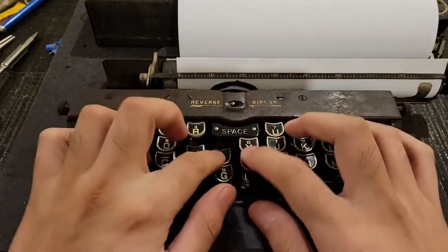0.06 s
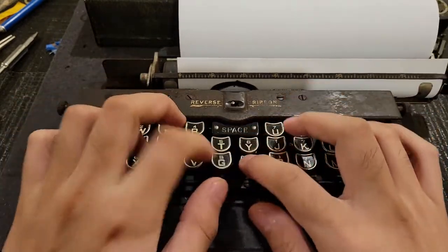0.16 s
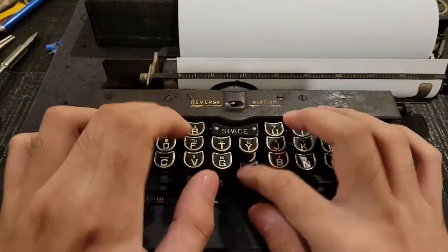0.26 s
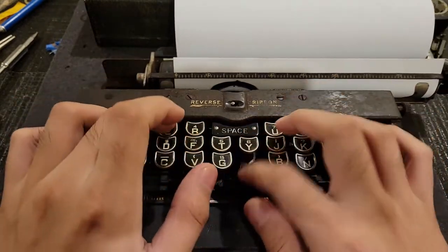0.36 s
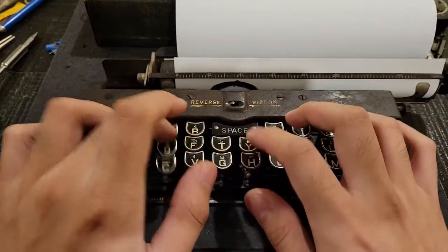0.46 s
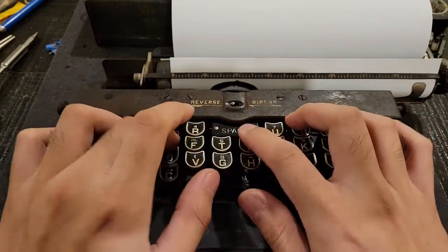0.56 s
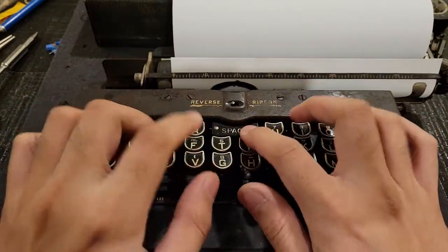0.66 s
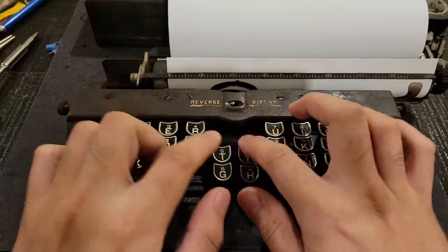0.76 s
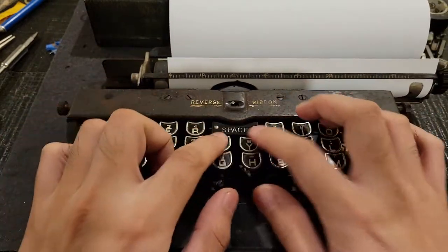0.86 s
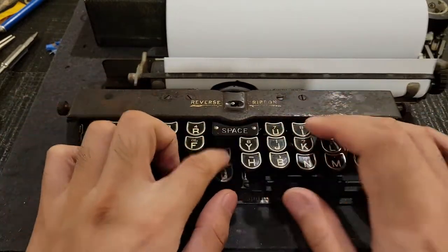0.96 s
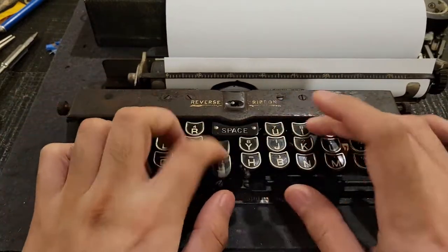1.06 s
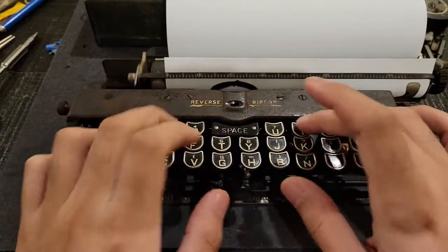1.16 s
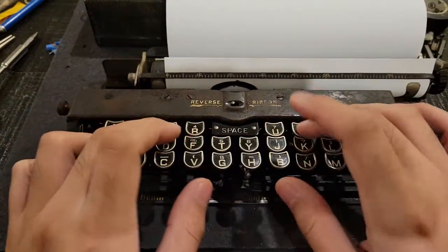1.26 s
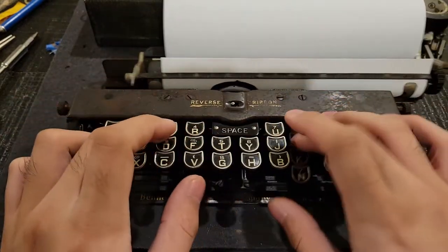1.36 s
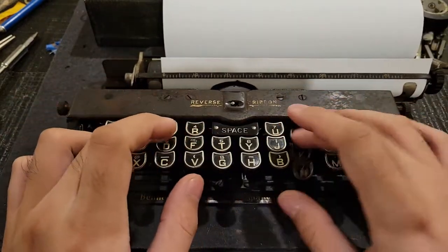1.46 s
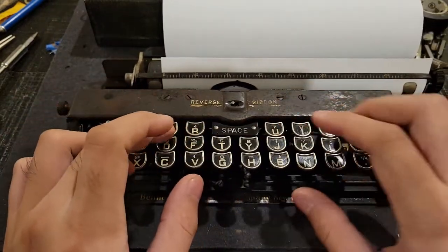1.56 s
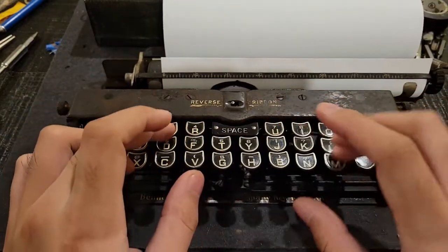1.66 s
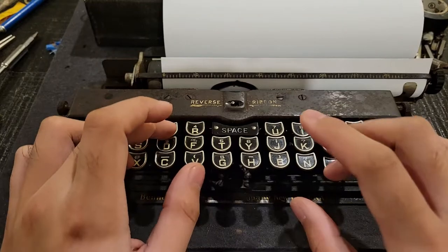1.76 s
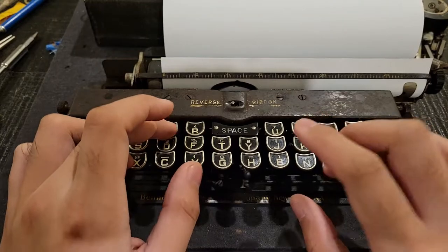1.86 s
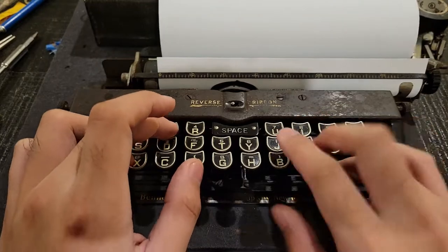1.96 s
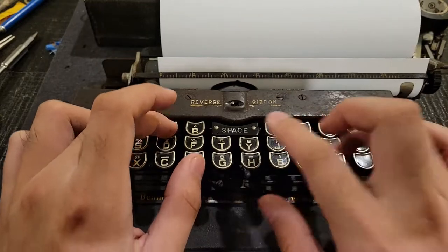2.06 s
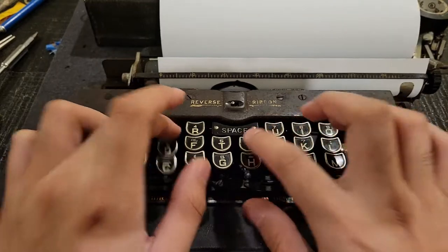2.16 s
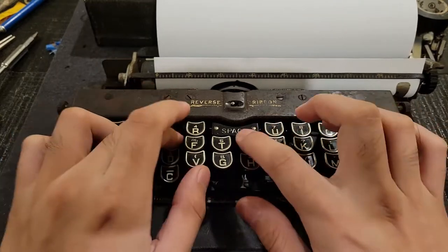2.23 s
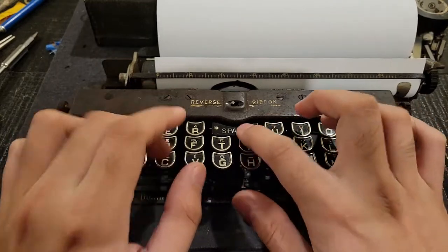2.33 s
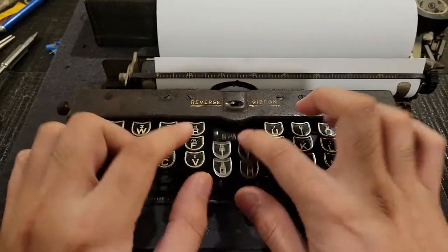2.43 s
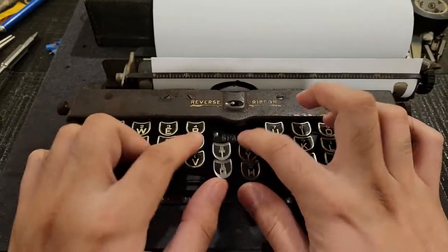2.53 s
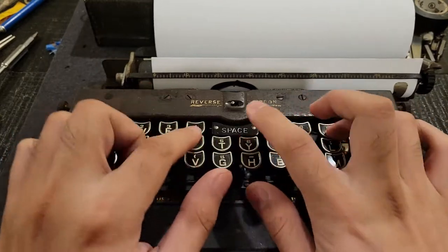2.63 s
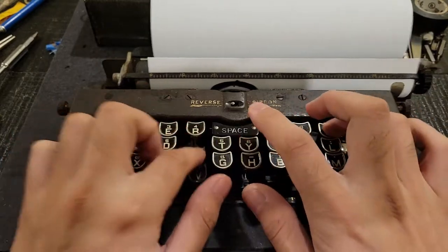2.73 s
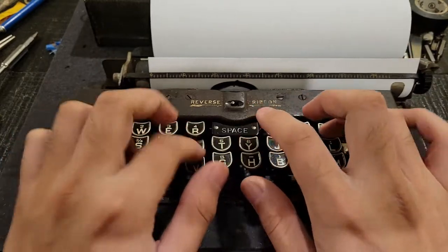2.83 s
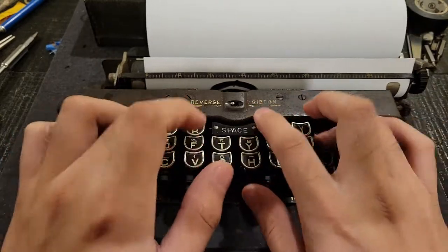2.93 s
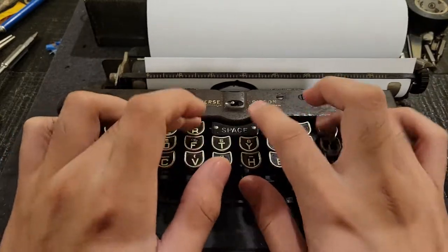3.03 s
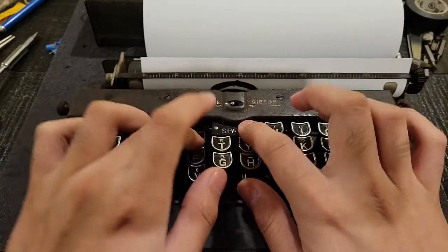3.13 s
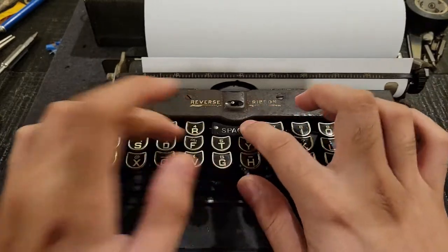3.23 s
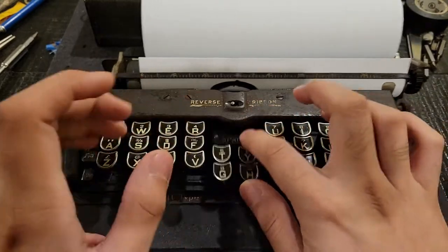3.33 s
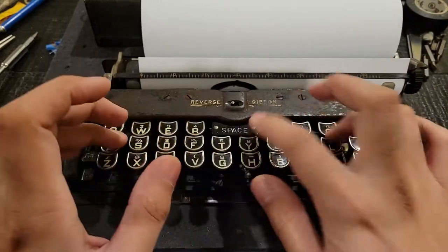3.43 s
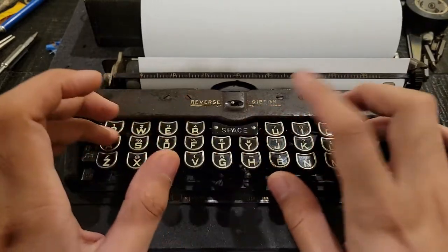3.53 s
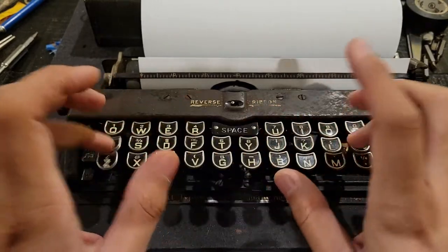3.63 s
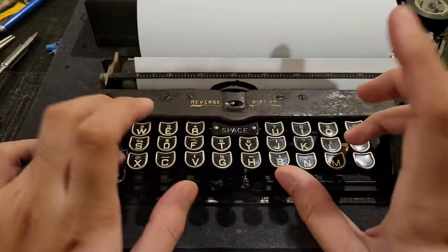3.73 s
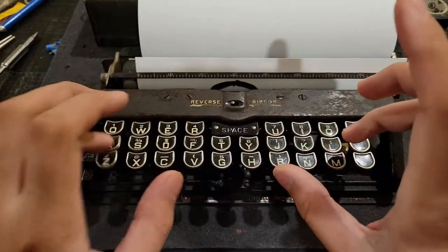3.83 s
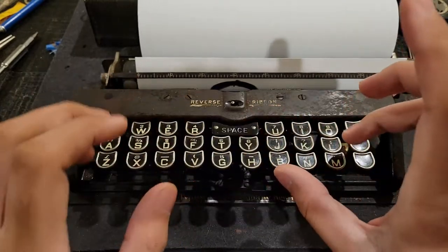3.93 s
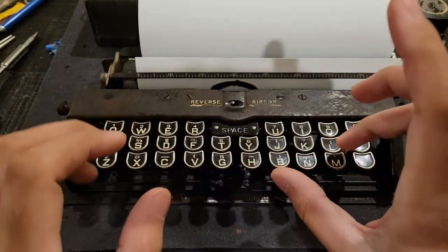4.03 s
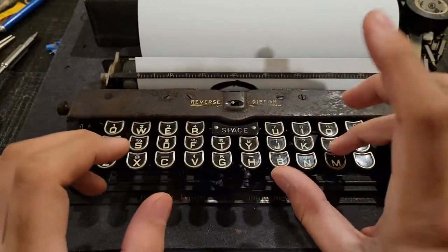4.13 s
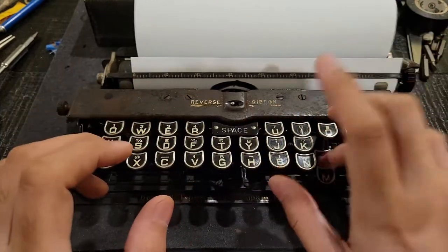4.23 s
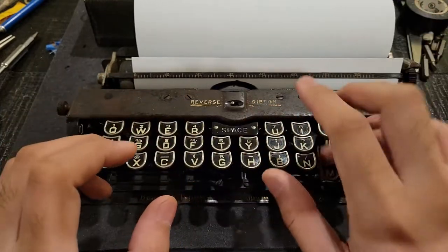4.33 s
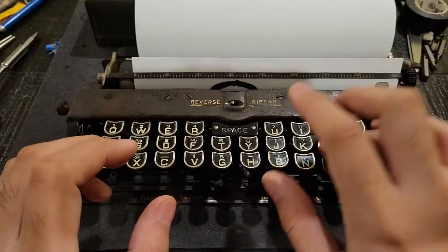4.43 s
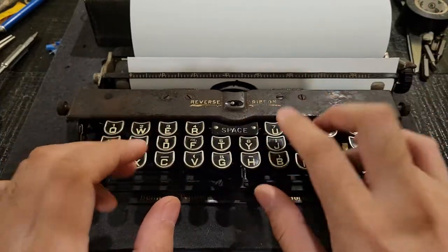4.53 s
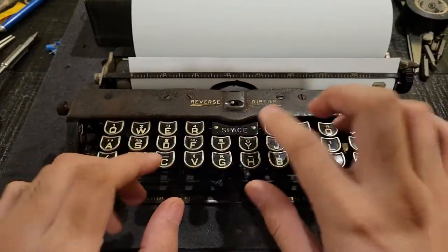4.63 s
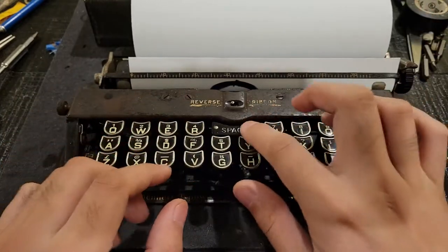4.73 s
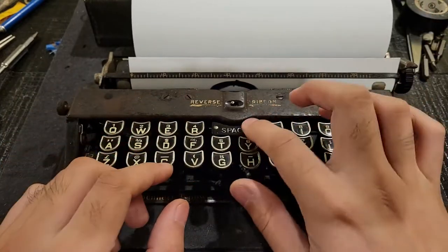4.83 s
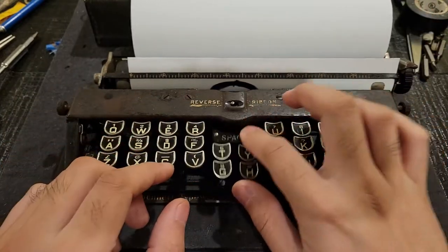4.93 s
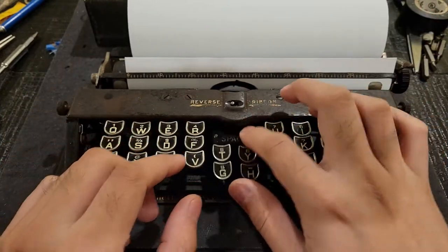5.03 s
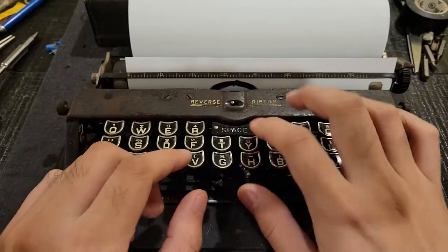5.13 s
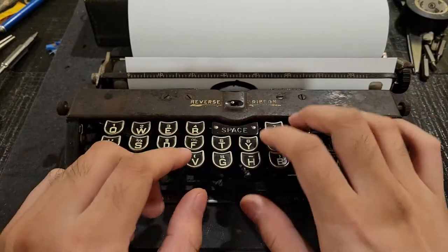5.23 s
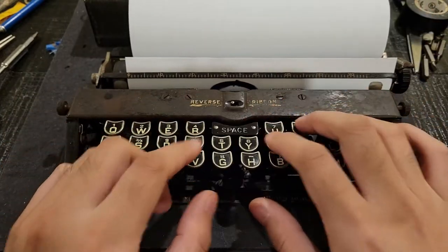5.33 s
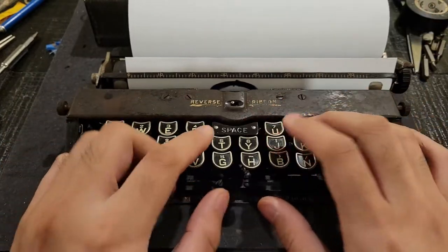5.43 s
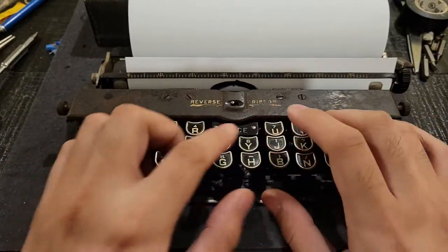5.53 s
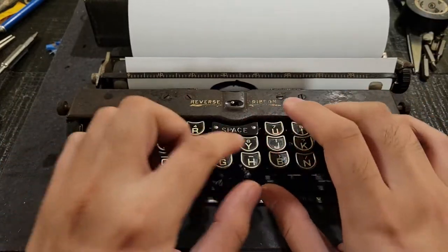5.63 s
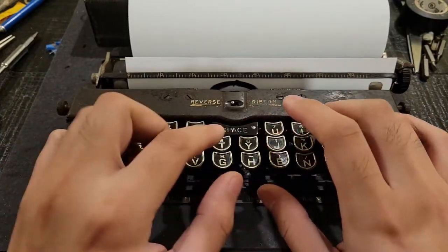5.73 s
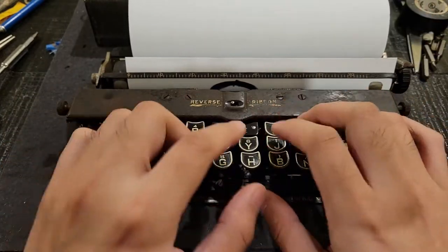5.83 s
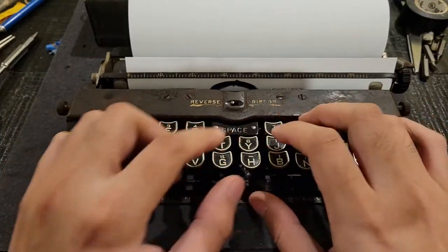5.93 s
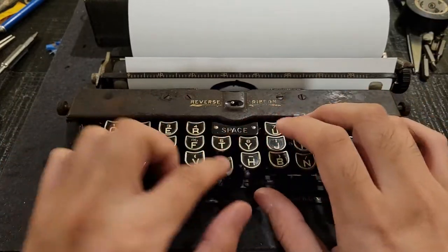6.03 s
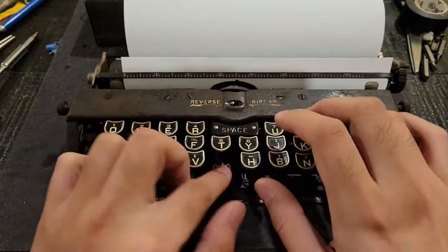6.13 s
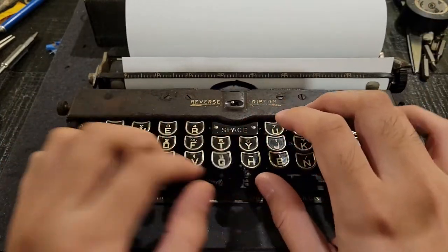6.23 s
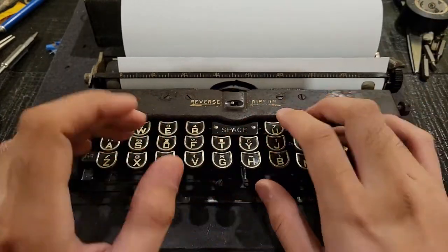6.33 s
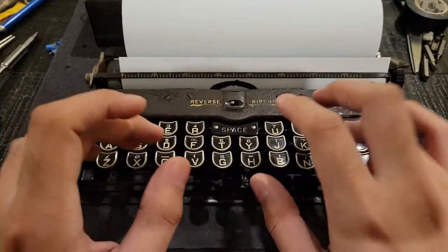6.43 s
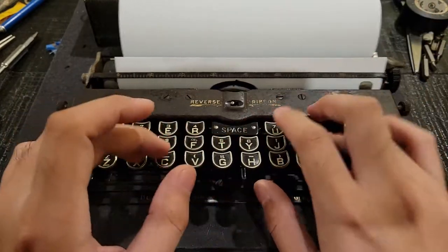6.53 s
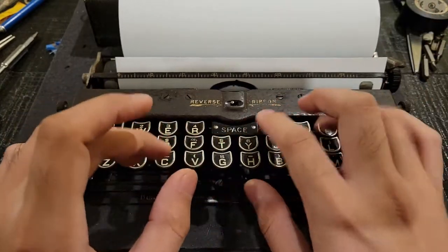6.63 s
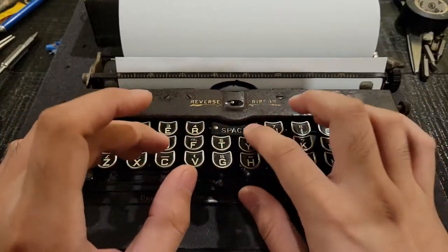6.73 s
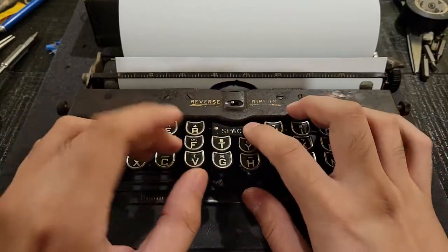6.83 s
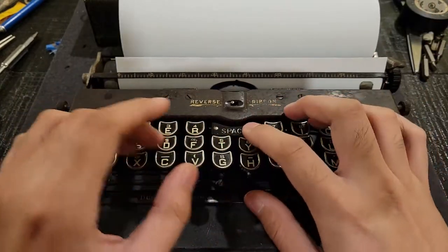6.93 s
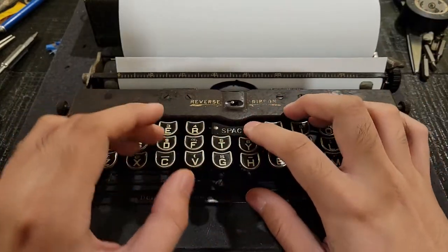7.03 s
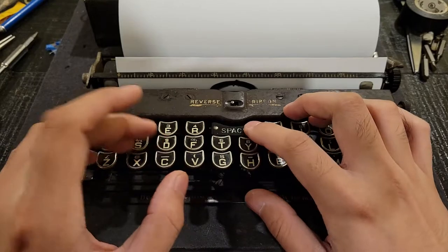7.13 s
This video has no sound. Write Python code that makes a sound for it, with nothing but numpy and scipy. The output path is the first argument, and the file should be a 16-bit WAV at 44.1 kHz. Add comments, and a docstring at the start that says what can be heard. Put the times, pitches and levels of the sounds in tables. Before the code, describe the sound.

Fast typing on an old steel typewriter: dense, sharp metallic clacks with loose-part rattle and soft desk thumps, short gaps, one longer pause, then typing again.

```python
"""Fast typing on a small steel typewriter on a desk, heard from just above the keys.
Every stroke is a run of knocks (key lever, type on the platen, escapement, return): a noise crack with the
chatter of loose parts, filtered by modes of steel levers, platen, case and base. The desk thumps, mostly
under bottoming keys: a soft noise push and a decaying sine. A return spring sings a thin sine now and then.
Random echoes of frame, desk and room follow the knocks, over quiet room noise with a wavering hum."""
import sys
import numpy as np
from scipy import signal
from scipy.fft import rfft, irfft
from scipy.io import wavfile
from scipy.ndimage import uniform_filter1d

SR = 44100
rng = np.random.default_rng(int(sys.argv[2]) if len(sys.argv) > 2 else 0)


def to_wav(s):
    """Save 16-bit WAV."""
    ch = np.atleast_2d(s).T  # columns
    pcm = np.round(np.clip(ch, -1, 1) * 32767)  # PCM
    wavfile.write(sys.argv[1], SR, pcm.astype(np.int16))


N = 317079

# low desk thumps, mostly keys bottoming out, one faint one from other handling;
# levels before fixed offsets: start_s, thump_db, top_ring_db (over thump)
DESK_THUMPS = [(0.1, -33, -6), (0.323, -32, -11.5), (0.551, -32.5, -3), (0.768, -30.5, 0.5),
               (1.01, -35.5, -2.5), (1.404, -35.5, -11), (1.529, -46, -23.5), (1.939, -35.5, -14.5),
               (2.237, -31.5, -1), (2.482, -29.5, -14.5), (2.758, -38.5, -10), (2.944, -32, -8),
               (3.128, -32.5, -3.5), (3.361, -30, -13), (3.713, -32.5, -3.5), (4.268, -32, -5),
               (4.505, -38.5, 4.5), (4.648, -43, -5), (4.974, -35, 3), (5.124, -51, -13),
               (6.094, -33.5, -3.5), (6.375, -33, -8.5), (6.579, -33.5, -0.5), (6.867, -40.5, -20)]


def gain_of(db):
    """Amplitude factor of a level in dB."""
    return 10 ** (np.asarray(db) / 20)


def evened(x):
    """Scales each row to rms 1."""
    return x / np.sqrt(np.mean(x ** 2, -1, keepdims=True) + 1e-30)


def read(points, hz):
    """Interpolates (Hz, value) points over log frequency."""
    f, value = np.transpose(points)
    return np.interp(np.log(hz + 1), np.log(f + 1), value)


def ringing(modes, hz, count, spread_db):
    """Summed mode responses; modes shift and wake unevenly, at random for each blow."""
    mode_hz, width_hz, mode_db = np.transpose(modes)
    loud, shift = rng.standard_normal((count, 2, len(mode_hz))).transpose(1, 0, 2)
    wake = gain_of(mode_db + spread_db * loud) * rng.choice([-1, 1], loud.shape)
    mode_hz = mode_hz * (1 + 0.018 * shift)
    response = 0
    for k in range(len(width_hz)):
        detune = (hz - mode_hz[:, k, None]) / width_hz[k]
        response = response + wake[:, k, None] / (1 + 2j * detune)
    return response


def to_ports(z, hz):
    """Two ports hear partly the same vibration, the nearer left one earlier and 1 dB louder."""
    # left-right likeness: frequency_hz, likeness
    likeness = [(40, 0.68), (500, 0.71), (1500, 0.75), (4000, 0.11)]
    lead_s = 0.11e-3
    same = np.clip(read(likeness, hz), 0, 1)
    mixed = same * z[0] + np.sqrt(1 - same ** 2) * z[1]
    right = mixed * np.exp(-2j * np.pi * hz * lead_s)
    return np.array([z[0] * gain_of(1.0), right])


def place(times_s, sounds):
    """Adds each two-channel sound at its time, which may lie just before the start."""
    size = sounds.shape[-1]
    out = np.zeros((2, N + 2 * size))
    for start_s, sound in zip(times_s, sounds.transpose(1, 0, 2)):
        out[:, size + round(start_s * SR):][:, :size] += sound
    return out[:, size:size + N]


def struck(push, response, db, window_ms):
    """Pushes through a response, set to db over their loudest window."""
    size = push.shape[-1]
    sound = irfft(to_ports(rfft(push) * response, np.fft.rfftfreq(size, 1 / SR)), size)
    window = max(round(window_ms * SR / 1000), 1)
    power = uniform_filter1d((sound ** 2).mean(0), window).max(-1)
    return sound * (gain_of(db) / np.sqrt(power))[:, None]


def base_ring(start_s, blow_db, case_db):
    """Base ring over each blow: follows the case, weaker; the knock at a thump can ring it harder."""
    under_case_db, thump_lag_s = -7.5, 0.006
    hard_ring_db, ring_per_thump_db, most_over_blow_db = -9.5, 0.58, -7
    base_db = blow_db + case_db + under_case_db
    for at_s, thump_db, _ in DESK_THUMPS:
        k = np.argmin(abs(start_s - at_s - thump_lag_s))
        hard_db = min(hard_ring_db + ring_per_thump_db * thump_db, blow_db[k] + most_over_blow_db)
        base_db[k] = max(base_db[k], hard_db)
    return base_db - blow_db


def contact_push(t, chatter_db, slide_end):
    """Noise force: a short crack; loose levers scrape up to it and chatter after it unevenly."""
    crack_t60_s, chatter_t60_s = 0.02, 0.1
    count, size = len(chatter_db), len(t)
    early, late = np.minimum(t, 0), np.maximum(t, 0)
    crack = np.exp(early / 0.0006) * gain_of(-60 * late / crack_t60_s)
    scrape = gain_of(-2.5) * np.exp(early / 0.0049)
    chatter = np.where(t < 0, scrape, 1) * gain_of(-60 * late / chatter_t60_s)
    wander = uniform_filter1d(rng.standard_normal((count, size)), size=16)
    uneven = gain_of(4.77 * evened(wander))
    rebounds = rng.random((count, size)) < 200.0 / SR  # about 200 per second
    uneven += gain_of(8.0) * signal.lfilter([1], [1, -0.97], rebounds)
    envelope = crack + gain_of(chatter_db)[:, None] * chatter * uneven
    envelope = envelope * (t < slide_end)
    return rng.standard_normal((count, 2, size)).transpose(1, 0, 2) * envelope


def knocks(size=4608):
    """Each contact excites the steel levers at once, and platen, case and base more slowly."""
    # contacts, levels before fixed offsets: start_s, blow_db, then over the blow:
    # platen_db, case_db, chatter_db (loose parts)
    contacts = [(0.0, -36, -12, -14.5, 24.5), (0.048, -23.5, -26, -20.5, -5.5),
                (.0636, -25, -10.5, -10.5, -4), (0.0771, -21.5, -7.5, -6.5, -5),
                (0.1016, -19.5, -18.5, -12, 16.5), (.154, -29, -10.5, -11.5, -1),
                (0.1849, -11, -22, -19, -8), (0.2446, -33.5, -19.5, -18.5, -8),
                (.2888, -33.5, -9, -7, -3.5), (0.3042, -14.5, -11, -14.5, -15),
                (.3298, -14.5, -26, -14.5, -18.5), (0.4143, -35, -8, -7.5, -4),
                (0.4446, -9, -21.5, -19.5, -15), (0.4578, -13.5, -18.5, -18.5, -19),
                (.4947, -20.5, -21, -17, -11), (.5085, -25.5, -12, -11.5, -14.5),
                (.532, -13, -14.5, -16.5, -7), (0.5575, -17, -18, -7.5, -17), (.612, -26.5, -10, -22.5, -2),
                (0.6355, -11.5, -16.5, -23.5, -20.5), (0.6637, -13.5, -17.5, -15, -15.5),
                (0.6888, -20, -17, -20, -16), (0.7367, -21, -20.5, -13, 2),
                (.752, -17.5, -12.5, -11.5, -12.5), (.779, -15.5, -13.5, -14.5, -15),
                (0.8703, -8, -18.5, -21, -21), (.9514, -37, -15, -10.5, -18), (0.9643, -20, -17, -13, -6),
                (.985, -27, -2, -5, -13.5), (1.012, -11, -19, -17, -20), (1.0859, -29, -14.5, -9, 4.5),
                (1.1128, -10.5, -16.5, -20, -12), (1.2416, -33, -25, -34.5, -26),
                (1.294, -49.5, -16.5, -14.5, -15.5), (1.325, -46, -28, -11, -20),
                (1.336, -32, -19, -24, -22), (1.35, -22.5, -13.5, -13.5, -14),
                (1.3717, -23.5, -6.5, -9, -0.5), (1.3984, -8, -16, -20, -14), (1.4909, -38.5, -8, -7, 3),
                (1.52, -17, -11, -14, -18), (1.549, -13.5, -14.5, -16.5, -6.5),
                (1.5811, -22.5, -16.5, -16.5, -12), (1.716, -42.5, -7, -9.5, -3.5),
                (1.728, -31.5, -15, -15, -28.5), (1.8949, -41, -1.5, -15.5, -8.5),
                (1.918, -21.5, -8.5, -8, -3.5), (1.9364, -18, -26, -9, -4.5),
                (1.9464, -15.5, -19.5, -12.5, -33.5), (2.0419, -33, -13, -7.5, -1.5),
                (2.0604, -19.5, -15, -14.5, -2.5), (2.117, -15, -11.5, -17, -6),
                (2.1571, -20.5, -11.5, -13.5, 1), (2.1945, -25.5, -11, -9.5, -5.5),
                (2.2232, -15, -16, -11.5, 0), (2.246, -19.5, -11, -12, -11.5),
                (2.2997, -26.5, -12, -14.5, -12), (2.3223, -12, -22.5, -19.5, -14.5),
                (2.356, -15.5, -13, -15.5, -11.5), (2.4556, -19.5, -23, -11, -13),
                (2.4695, -18, -6.5, -12.5, -7.5), (2.4949, -18, -20, -10.5, -9.5),
                (2.5879, -12.5, -22, -16.5, -16.5), (2.722, -30.5, -40, -14, -14.5),
                (2.7311, -21, -15, -8.5, -4), (2.752, -11.5, -20, -11, -1),
                (2.767, -8.5, -14.5, -18.5, -21), (2.8342, -28.5, -11, -15, 3.5),
                (2.8614, -11, -18.5, -23, -16.5), (2.8845, -17, -16, -11, -9.5),
                (2.9095, -17.5, -17, -12, -14), (2.9299, -20.5, -7, -7.5, -9),
                (2.941, -17.5, -14.5, -4.5, 1.5), (2.9523, -10, -18.5, -24.5, -11),
                (3.016, -35, -6.5, -8, 5), (3.044, -17.5, -12, -18, -15), (3.0749, -25, -14.5, -4.5, -10),
                (3.0905, -12, -16, -18, -13.5), (3.1195, -16.5, -14, -15.5, 6),
                (3.1391, -13.5, -14.5, -23, -11.5), (3.1555, -16.5, -11, -13.5, -9.5),
                (3.21, -29.5, -9.5, -14, -9.5), (3.234, -11, -19.5, -20.5, -15),
                (3.248, -14, -14.5, -14.5, -2.5), (3.3345, -20.5, -23.5, -13.5, -1),
                (3.3482, -18.5, -10.5, -9.5, -13.5), (3.3738, -19.5, -13.5, -8, -17),
                (3.3823, -20.5, -31, -16.5, -13), (3.425, -29.5, -19, -14.5, -1),
                (3.4425, -11, -21, -19, -25), (3.657, -21.5, -33.5, -39, -24),
                (3.664, -33, -8.5, -10.5, -3), (3.6991, -18, -9, -12.5, -6),
                (3.7145, -8.5, -18.5, -18.5, -10), (3.8074, -30.5, -13, -7, -3.5),
                (3.819, -14, -9, -25, -31.5), (3.8715, -13, -10, -17, -15.5), (3.9096, -20, -16.5, -16, -2),
                (4.2183, -23.5, -8.5, -18, -7), (4.2496, -20, -9, -11, 1), (4.262, -29, -17, 0.5, 18.5),
                (4.2718, -15.5, -17, -10, -10.5), (4.368, -23.5, -9, -14, -7), (4.4045, -45.5, 6, -3, -12),
                (4.424, -14, -13.5, -16, -13.5), (4.4576, -20, -8, -15, 5.5), (4.4804, -17, -11, -6.5, 24),
                (4.5028, -13, -18.5, -18, -15), (4.6151, -20.5, -10, -13, -4),
                (4.6523, -31.5, -17.5, 0.5, 5), (4.6659, -13.5, -12.5, -29, -10),
                (4.6989, -20, -18, -13, -9), (4.904, -50.5, -9.5, -7, -2.5),
                (4.9308, -24.5, -16.5, -9.5, -13), (4.9513, -23.5, -12.5, -4.5, -20.5),
                (4.9792, -19.5, -14.5, -5.5, -15), (5.0775, -39.5, -26, -4.5, -26),
                (5.1058, -26, -7, -9, 6.5), (5.1125, -10, -23.5, -17, -41.5),
                (5.2739, -39.5, -29, -25, -31), (5.288, -54.5, -17, -2, -14.5), (5.371, -67.5, -11, 4, 3),
                (5.466, -63, -22, -28, -23), (5.83, -78, -9, 3, 6), (6.0574, -23, -16, -9, -1),
                (6.0754, -15, -14.5, -15, -12.5), (6.1002, -8.5, -15, -17, -29),
                (6.189, -30.5, -11, -10.5, -14), (6.213, -35, -10, -10, -6),
                (6.2299, -18.5, -12, -17.5, -12.5), (6.2498, -24, -12, -8, -10),
                (6.3094, -36, -26, -17.5, -16), (6.3276, -22.5, -8.5, -14, -14.5),
                (6.3512, -21, -9, -8, -5), (6.3646, -18.5, -17, -8.5, 0), (6.378, -17.5, -12, -16, 7.5),
                (6.451, -15.5, -7, -15, -19.5), (6.475, -26.5, -7, -3, -6), (6.4928, -12, -12, -22, -11),
                (6.5302, -16, -18, -17.5, -6), (6.5434, -17.5, -10, -9, 21),
                (6.57, -12.5, -17.5, -13.5, -16), (6.6422, -36, -8, -9.5, -12),
                (6.6586, -18.5, -6.5, -10.5, -26), (6.6845, -24, -7, -7, -14.5),
                (6.7013, -8.5, -17, -19, -21), (6.7345, -19.5, -18, -21, -7.5), (6.863, -62, -3, 11, -1),
                (7.02, -74, -8, 2, 0)]
    # click spectrum: frequency_hz, level_db
    click = [(800, -36), (2500, 3.5), (5000, -1), (9000, -2), (11000, -6), (14000, -3)]
    # modes of levers, platen, case, base: frequency_hz, width_hz, level_db
    levers = [(2625, 190, 5), (4180, 150, 12), (5200, 540, 2), (6570, 370, 3), (7910, 210, 3),
              (13040, 530, 7.5), (15200, 600, -8.5)]
    platen = [(1475, 310, -0.5), (1800, 860, -9.5), (1980, 170, -3.5)]
    case = [(657, 36, -8.5), (771.6, 75, 0.5), (876, 88, -3.5), (1021.5, 180, -7.5)]
    base = [(373, 190, -5.5), (389.7, 80, 2.5), (465, 60, -2.5)]
    slide_s, neutral_ring_db = 0.02, -14.5
    bright_per_ring_db, bright_per_blow_db = -0.7, 0.0561

    start_s, blow_db, platen_db, case_db, chatter_db = np.transpose(contacts)
    count = len(start_s)
    # a glancing contact is bright and hardly moves platen and case; a heavy one is dull
    bright_db = bright_per_ring_db * ((platen_db + case_db) / 2 - neutral_ring_db)
    bright_db += bright_per_blow_db * (blow_db - blow_db.mean())  # harder is a little brighter
    base_db = base_ring(start_s, blow_db, case_db)

    t, hz = np.arange(size) / SR - slide_s, np.fft.rfftfreq(size, 1 / SR)
    push = contact_push(t, chatter_db, slide_end=t[-1] / 2)
    tilt = gain_of(bright_db[:, None] * np.tanh(2.2 * np.log((hz + 1) / 7000)) / 2)
    steel = gain_of(read(click, hz)) + 0.35 * ringing(levers, hz, count, spread_db=3.0)
    sound = struck(push, steel * tilt, blow_db + 1.0, window_ms=0.73)
    heavy = push * (1 - np.exp(-np.maximum(t, 0) / 0.0013))  # heavy parts take the blow slowly
    for modes, ring_db in (platen, platen_db), (case, case_db), (base, base_db):
        response = ringing(modes, hz, count, spread_db=2.5)
        sound += struck(heavy, response, blow_db + ring_db, window_ms=11.3)
    sound *= np.minimum((t[-1] - t) / slide_s, 1)  # end fade
    return place(start_s + 0.00045 - slide_s, sound)


def tail(x, decay, delay_ms):
    """Dense random echoes, each band dying at its own speed, partly different at each port."""
    noise = rng.standard_normal((2, SR * 3 // 4))
    hz, t, z = signal.stft(noise, SR, nperseg=256)
    fading = z * gain_of(-60 * t / read(decay, hz)[:, None])
    echo = signal.istft(fading, SR, nperseg=256)[1]
    size = echo.shape[1]
    echo *= 1 - np.exp(-np.arange(size) / SR / (delay_ms / 1000))  # gradual build-up
    echo = irfft(to_ports(rfft(echo), np.fft.rfftfreq(size, 1 / SR)), size)
    return signal.fftconvolve(x, echo / np.linalg.norm(echo[0]), axes=1)[:, :N]


def shifting(x, decay, delay_ms):
    """The echo colour drifts: three random tails take turns."""
    turn = 2 * np.pi * np.arange(N) / SR * 2.3  # 2.3 turns per second
    out = 0
    for k in range(3):
        share = np.sqrt(2 / 3) * np.cos(turn / 2 + np.pi * k / 3)
        out = out + tail(x * share, decay, delay_ms)
    return out


def air():
    """Faint room noise, spectrally shaped, with a hum of narrow noise bands that wavers."""
    # room noise spectrum shape: frequency_hz, density_db (per Hz, relative)
    spectrum = [(12, -52.5), (20, -21.5), (65, 1.5), (86, -8), (128, -5.5), (151, -12.5), (440, -22.5),
                (521, -28.5), (1200, -33.5), (3000, -37.5), (16500, -53.5)]
    # hum bands: frequency_hz, width_hz, rms_db
    hum = [(59.4, 6, -82), (125, 5, -80.5), (426, 8, -85)]
    noise_rms_db = -63
    hz = np.fft.rfftfreq(N, 1 / SR)
    z = rfft(rng.standard_normal((2, N)))
    noise = irfft(to_ports(z * gain_of(read(spectrum, hz)), hz), N)
    out = gain_of(noise_rms_db) * evened(noise)
    for hum_hz, width_hz, rms_db in hum:
        band = z[::-1] / (1 + (2 * (hz - hum_hz) / width_hz) ** 2)
        out += gain_of(rms_db) * evened(irfft(to_ports(band, hz), N))
    return out


def thumps(size=32768):
    """A soft push into the desk: a dull rocking thud, then the top rings on."""
    # desk modes: frequency_hz, width_hz, level_db
    desk = [(58, 13, -14.5), (81, 76, 8.5), (167, 25, -21)]
    top_hz, top_t60_s = 124.8, 0.5
    start_s, thump_db, top_db = np.transpose(DESK_THUMPS)
    count = len(start_s)
    t, hz = np.arange(size) / SR, np.fft.rfftfreq(size, 1 / SR)
    push = rng.standard_normal((count, 2, size)).transpose(1, 0, 2) * t * np.exp(-t / 0.019)
    low_cut = 1 + (40.0 / (hz + 1)) ** 4
    response = ringing(desk, hz, count, spread_db=3.0) / low_cut
    thud = struck(push, response, thump_db - 7.0, window_ms=36)
    # the top's pitch varies a little at random from thump to thump
    varied_hz = top_hz * (1 + 0.017 * rng.standard_normal((count, 1)))
    envelope = (1 - np.exp(-t / 0.028)) * gain_of(-60 * t / top_t60_s) * (1 - t / t[-1])
    top = np.sin(2 * np.pi * varied_hz * t) * envelope
    return place(start_s - 0.006, thud + top * gain_of(thump_db + top_db + 1.5)[:, None])


def springs():
    """A return spring sings one thin decaying tone."""
    # spring tones: start_s, end_s, level_db (at start), t60_s
    tones = [(3.434, 3.654, -51.5, 1.6), (5.115, 5.394, -66, 0.87)]
    spring_hz = 885
    t = np.arange(N) / SR
    level = np.zeros(N)
    for start_s, end_s, level_db, t60_s in tones:
        level += gain_of(level_db - 60 * abs(t - start_s) / t60_s) * (t > start_s) * (t < end_s)
    return np.sin(2 * np.pi * spring_hz * t) * uniform_filter1d(level, 200)


def scene():
    """Knocks with their frame, desk and room echoes, plus thumps, springs and air."""
    # frame and desk echo decay: frequency_hz, t60_s
    rattle = [(260, .23), (700, 0.2), (1840, 0.23), (4850, 0.13), (12800, 0.13)]
    # room echo decay: frequency_hz, t60_s
    room = [(300, 0.37), (2000, 0.44), (12800, 0.28)]
    high_pass = signal.butter(4, 270, "high", fs=SR, output="sos")  # too small to radiate bass
    keys = signal.sosfilt(high_pass, knocks())
    frame_echo = gain_of(-11) * shifting(keys, rattle, delay_ms=4.1)
    room_echo = gain_of(-20.5) * tail(keys, room, delay_ms=15.0)
    return keys + frame_echo + room_echo + thumps() + springs() + air()


def record(dry):
    """Brief level dips, a soft ceiling, a step down in the top treble, then the band limit."""
    # level dips: center_s, half_length_ms
    dips = [(.044, 0.84), (1.32, 2.1), (3.65, 4.2), (4.204, 3.5)]
    ceiling, shelf_hz, edge_hz = 0.9, 15950, 16900
    t = np.arange(N) / SR
    for center_s, half_ms in dips:
        dry = dry * np.clip(abs(t - center_s) * 2000 / half_ms - 1, 0.03, 1)
    dry = dry / (1 + (dry / ceiling) ** 4) ** 0.25
    below = signal.oaconvolve(dry, signal.firwin(255, shelf_hz, fs=SR)[None], "same")
    shelved = below + gain_of(-36.0) * (dry - below)
    band_limit = signal.firwin(1023, edge_hz, window=("kaiser", 9), fs=SR)
    return signal.oaconvolve(shelved, band_limit[None], "same")


dry = scene()
out = record(dry)
to_wav(out)
```